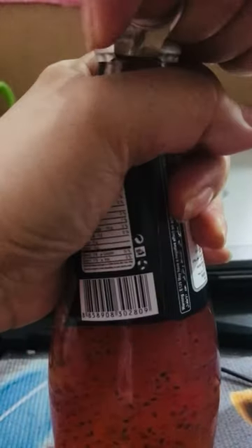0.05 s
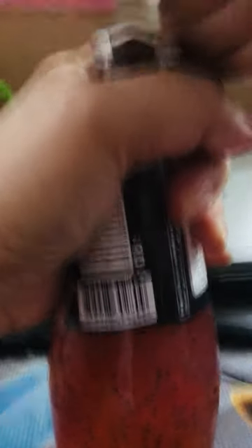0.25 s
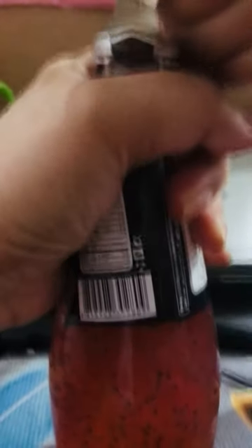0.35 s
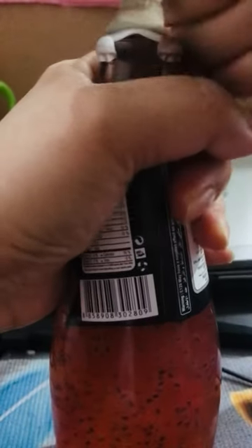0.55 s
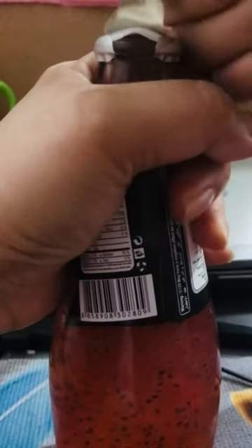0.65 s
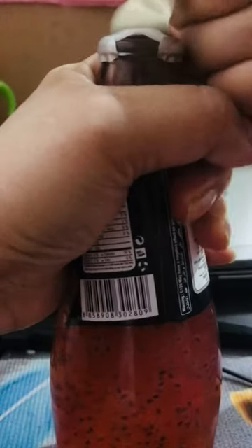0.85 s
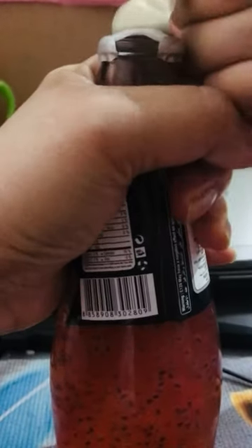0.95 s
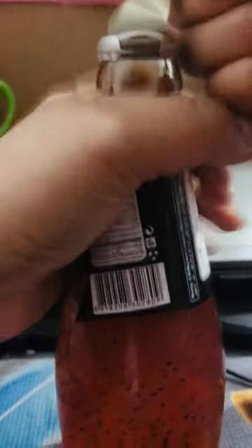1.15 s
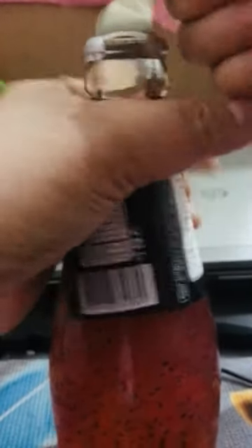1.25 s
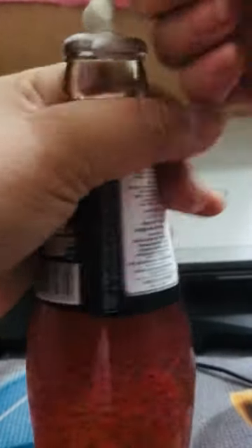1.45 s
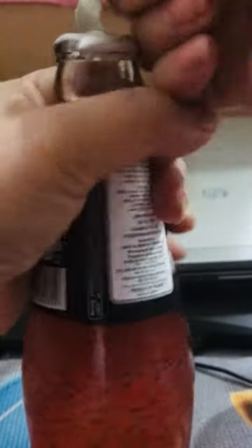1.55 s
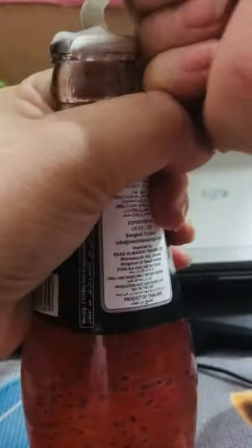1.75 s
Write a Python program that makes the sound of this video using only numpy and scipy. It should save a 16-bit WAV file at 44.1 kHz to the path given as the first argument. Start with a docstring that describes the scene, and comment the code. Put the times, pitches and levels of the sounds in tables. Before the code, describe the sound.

A glass bottle's metal cap pops open with a sharp crack and dull thump at about 0.25 seconds, after a faint whistling hiss. Soft finger rubbing follows. From 1.1 seconds the cap scrapes and ticks on the rim, clinks against the glass at 1.4, and clicks back on near 1.8. Everything is close, in a small room with a faint low hum.

```python
"""A small room, the microphone close to a glass bottle whose metal pull-ring cap is being levered off.
Air hisses and whistles through the loosening seal, then the cap pops and jolts the bottle in the hand.
The cap scrapes off the rim, ticks, clinks against the glass and clicks back onto it.
Fingers rub and squeak faintly; behind them are a low rumble, a hum and the room's short tail."""
import sys
import numpy as np
from scipy import signal
from scipy.fft import rfft, irfft
from scipy.io import wavfile
from scipy.ndimage import uniform_filter1d

SR = 44100
rng = np.random.default_rng(int(sys.argv[2]) if len(sys.argv) > 2 else 0)


def to_wav(s):
    """Save 16-bit WAV."""
    ch = np.atleast_2d(s).T  # columns
    pcm = np.round(np.clip(ch, -1, 1) * 32767)  # PCM
    wavfile.write(sys.argv[1], SR, pcm.astype(np.int16))


N = 79380
T = np.arange(N) / SR

# Spectra of room tone, grip, scrape, leak and pop. Each row: frequency in Hz, relative level in dB.
RUMBLE_COLOUR = [(15, -57), (25, -26.5), (42, -2), (64, 1.5), (153, -12.5), (285, -14), (384, -18),
                 (451, -23), (641, -26), (2110, -32.5), (3160, -30.5), (4870, -35), (16000, -38.5)]
RUB_COLOUR = [(300, 3.5), (800, -4.5), (2400, -1.5), (4000, -2.5), (7500, -4.5), (11000, -7.5),
              (15000, -1.5), (17000, -16.5)]
SCRAPE_COLOUR = [(200, 12), (600, -18), (1500, -15.5), (2400, 1), (4000, -1.5), (7500, -4), (12000, -4),
                 (15000, 1.5), (17000, -0.5)]
LEAK_COLOUR = [(500, -14.5), (2700, -18.5), (4700, -12.5), (6600, -2.5), (8200, -17), (9600, -5.5),
               (10400, -9.5), (11500, 2.5), (15500, -1), (17000, -9)]
POP_COLOUR = [(150, -7), (350, 2), (550, -18.5), (850, -18), (1050, -2), (3500, -1.5), (5500, -6),
              (8200, -6), (10300, -11), (12500, 6), (15500, 0), (17000, -19.5)]
# The course of the rubbing grip and of the leaking air. Each row: time in seconds, level in dB.
RUB_LEVEL = [(.4, -76), (.62, -74.5), (.7, -68.5), (.8, -74.5), (.96, -69.5), (1.05, -64.5), (1.11, -60),
             (1.19, -53), (1.25, -56.5), (1.29, -54.5), (1.34, -62), (1.4, -54), (1.49, -60), (1.6, -67.5),
             (1.69, -69), (1.74, -65.5), (1.8, -58.5)]
LEAK_LEVEL = [(0, -53.5), (.035, -51.5), (.09, -53), (.128, -58), (.16, -56.5), (.185, -52.5),
              (.217, -54.5), (.224, -37.5), (.24, -44)]
# Skin sliding on metal. Each row: centre in seconds, level in dB, half length in seconds.
SLIDES = [(1.588, -63, 0.031), (1.713, -61, .003), (1.721, -60, .009)]
# Skin squeaking on glass. Each row: centre and half length in seconds, pitch in Hz, level in dB.
SQUEAKS = [(.72, 0.037, 3106, -75), (1.011, 0.023, 3590, -60)]
# Jolts of the bottle. Each row: start in seconds, level in dB, pitch in Hz, T60 in seconds.
JOLTS = [(0.053, -49, 242, 0.04), (.097, -45.5, 243, 0.031), (0.2228, -33, 210, 0.047),
         (0.2418, -14.5, 246.4, 0.042), (0.2485, -12, 72.8, 0.1), (0.2511, -23, 190, .05),
         (.2512, -24, 359.6, 0.042), (.298, -42, 125, 0.16), (.375, -42, 79.6, 0.1),
         (0.653, -48.5, 450, .04), (0.933, -46.5, 242, 0.038), (1.139, -36, 227, 0.047),
         (1.158, -44, 250, 0.062), (1.16, -27.5, 62.3, 0.13), (1.409, -34.5, 62.4, 0.063),
         (1.531, -46, 74, 0.091), (1.771, -54, 380, 0.07)]
# The cap dragged over the rim. Each row: start in seconds, level in dB, hold in seconds.
SCRAPES = [(1.139, -43, .002), (1.141, -40, 0.0027), (1.1505, -44.5, .003), (1.156, -35.5, 0.0044),
           (1.173, -49, 0.013)]
# Ticks of cap and fingers. Each row: start in seconds, knock in dB, its pitch in Hz, crack in dB.
TICKS = [(.051, -50.5, 2640, -45), (.076, -51.5, 1880, -66), (.096, -54, 2670, -71),
         (0.195, -52.5, 2160, -53), (0.222, -39.5, 2400, -37), (0.2905, -38.5, 2974, -37.5),
         (.333, -52, 1870, -57), (.366, -57.5, 4500, -52), (0.572, -58, 2504, -58.5), (.65, -52, 1000, -61),
         (.665, -71.5, 3200, -53), (1.0647, -44.5, 3600, -44), (1.068, -47.5, 3000, -42.5),
         (1.086, -59, 3500, -54.5), (1.134, -38.5, 2130, -42), (1.187, -49, 1810, -55),
         (1.207, -44, 2420, -38), (1.2324, -39.5, 3930, -34), (1.241, -50, 3000, -50),
         (1.258, -39.5, 2100, -46), (1.272, -45, 2010, -62), (1.2815, -35.5, 2500, -37.5),
         (1.288, -51, 3070, -52), (1.3047, -45, 3280, -73), (1.355, -56, 3100, -33.5),
         (1.387, -53.5, 702, -60), (1.397, -44, 2100, -60), (1.403, -42, 2180, -51),
         (1.411, -40, 2480, -39), (1.469, -40.5, 1310, -59), (1.4744, -41, 2090, -60),
         (1.524, -42, 3340, -44)]
# Ringing modes. Each row: frequency in Hz, level in dB, T60 in seconds.
GLASS_MODES = [(2235, -1.5, 0.27), (2620, -3.5, .3), (5340, -12.5, 0.29), (11600, -16, .13)]
NECK_AIR_MODES = [(1065, -20.5, 0.035), (1070, -58, 0.65)]
BENT_CAP_MODES = [(1610, -26.5, 0.019), (2563, -30.5, 0.026), (2712, -24.5, 0.044), (4045, -25.5, 0.03),
                  (4192, -23, .02), (5170, -34, .03), (5500, -30, 0.029), (6260, -24, 0.018),
                  (6840, -29.5, .025), (9350, -29.5, .018), (12510, -26, 0.022), (13600, -30, .022),
                  (14210, -26, 0.026), (14720, -26, .018)]
FREED_CAP_MODES = [(3334, -16.5, .04), (3490, -26.5, .022)]
LOOSE_CAP_MODES = [(1580, -22, 0.01), (2450, -9.5, 0.019), (2546, 2, 0.013), (3500, -6.5, .02),
                   (3875, 3.5, .016), (4240, -37, 0.23), (5244, -6.5, 0.09), (6056, -22.5, 0.13),
                   (6640, -25.5, 0.13), (8550, -18, 0.067), (8770, -14, 0.097), (9200, -10.5, 0.047),
                   (9200, -15.5, 0.073), (11700, -16, 0.053), (12900, -23, 0.026)]
SEATED_CAP_MODES = [(3165, -3.5, 0.019), (5790, -1.5, 0.015), (7070, -4, 0.0081), (8800, -2, 0.0092),
                    (9950, -13, 0.02), (12030, -2, 0.014), (12200, -8, .032), (14060, -9, .033),
                    (14900, -3, .022)]
# Touches on the glass, and crimps jumping the rim. Each row: start in seconds, gain in dB.
GLASS_TOUCHES = [(.245, -54), (1.069, -63.5), (1.14, -40.5), (1.16, -42.5), (1.355, -50.5), (1.511, -57)]
CRIMP_SNAPS = [(0.2401, -3), (0.2403, -7), (0.243, 5.5), (0.2455, -3), (0.2472, 2.5), (0.2491, -3)]
# Cap on glass. Each row: start in seconds, ring and knock in dB, knock pitch in Hz, crack in dB.
CLINKS = [(1.4157, -21.5, -28.5, 2440, -25.5), (1.509, -46, -29.5, 3900, -33),
          (1.5199, -49.5, -46, 5160, -46)]
# The cap pressed back on. Each row: start in seconds, gain in dB, low cut in Hz.
CLICKS = [(1.7573, -39.5, 9050), (1.7705, -28, 1950)]
# Two whistles in the gap and a list of short ones. Each row: time in seconds, pitch in Hz, level in dB.
LOW_WHISTLE = [(0, 7015, -62), (.04, 7390, -62), (.062, 6820, -56.5), (.08, 6480, -57.5), (.125, 5850, -63),
               (.15, 6320, -60.5), (.19, 6430, -66.5)]
HIGH_WHISTLE = [(.14, 8370, -70), (0.159, 9100, -56.5), (.171, 11800, -55.5), (0.187, 11100, -52.5),
                (.205, 10800, -57.5), (.222, 11300, -56)]
SIDE_WHISTLES = [
    [(.003, 10500, -66), (.016, 9300, -57.5), (.032, 8500, -83)],
    [(.135, 6000, -67), (.16, 5000, -66)],
    [(.172, 6700, -67.5), (.19, 5400, -62.5)],
    [(.178, 12300, -57), (.215, 11500, -53.5)],
]

POP_S, POP_ATTACK_S, CAP_FREE_S = .24, .002, .2488
TICK_T60_S, KNOCK_SPREAD = .0053, 1.22
WHISTLE_WIDTH_HZ, WHISTLE_WOBBLE = 210, .0063
RUMBLE_DB, HUM_DB, HUM_HZ = -60.5, -60.5, 57.5
CAP_LOW_HZ, MIC_LOW_HZ, TOP_HZ, CEILING = 1440, 44.2, 15850, .85


def amp(db):
    """Decibels to gain."""
    return 10 ** (np.asarray(db) / 20)


def unit(x):
    """Scale to rms 1."""
    return x / np.sqrt(np.mean(x ** 2))


def noise():
    """White noise."""
    return rng.standard_normal(N)


def band(x, lo_hz, hi_hz):
    """Band-pass."""
    sos = signal.butter(2, [lo_hz, min(hi_hz, SR / 2 - 1)], "band", fs=SR, output="sos")
    return signal.sosfilt(sos, x)


def colour(x, points):
    """Shape a steady sound by (Hz, dB) points; rms 1."""
    hz, db = np.array(points).T
    gain = amp(np.interp(np.log(np.fft.rfftfreq(N, 1 / SR) + 1), np.log(hz), db))
    return unit(irfft(rfft(x) * gain, N))


def walk(hz):
    """Random drift, mostly slower than hz; rms 1."""
    return unit(irfft(rfft(noise()) * np.exp(-(np.fft.rfftfreq(N, 1 / SR) / hz) ** 2), N))


def grains(per_s):
    """Dense micro-slips of random size."""
    return unit(noise() * (rng.random(N) < per_s / SR))


def fade(t60, hold=0):
    """Hold, then fall 60 dB every t60 seconds."""
    return np.exp(-np.log(1000) * np.clip((T - hold) / t60, 0, 10))


def at(s, x):
    """Start a sound at s seconds."""
    return np.concatenate([np.zeros(max(int(s * SR), 0)), x])[:N]


def burst(lo_hz, hi_hz, t60):
    """A short crack within a band; starts at about rms 1."""
    return band(noise() * fade(t60), lo_hz, hi_hz) * np.sqrt(SR / 2 / (hi_hz - lo_hz))


def ring(modes):
    """Struck modes, each a dying sine."""
    return sum(amp(db) * fade(t60) * np.sin(2 * np.pi * hz * T) for hz, db, t60 in modes)


def cap_ring(modes):
    """The struck cap, with its lowest frequencies removed."""
    return signal.sosfilt(signal.butter(4, CAP_LOW_HZ, "high", fs=SR, output="sos"), ring(modes))


def room_tone():
    """Quiet rumble and a wavering low hum, behind everything."""
    hum = np.sqrt(2) * np.sin(2 * np.pi * HUM_HZ * T + 1.2 * walk(2.6)) * amp(HUM_DB + 1.1 * walk(6))
    return amp(RUMBLE_DB) * colour(noise(), RUMBLE_COLOUR) + hum


def room_tail(x):
    """The small room answers with a diffuse tail, longest in the bass, blurred to a wash above it."""
    def tail(lo_hz, hi_hz, db, t60):
        reflections = unit(noise() * fade(t60) * np.minimum(T / .011, 1))
        return amp(db) * band(reflections, lo_hz, hi_hz) / np.sqrt(N)
    phase_drift = 3.2 * walk(hz=194)
    blurred = np.real(signal.hilbert(band(x, 350, 20000)) * np.exp(1j * phase_drift))
    mids = tail(450, 1300, db=-16.5, t60=.26) + tail(1200, 5500, db=-24.5, t60=.26)
    treble = tail(6900, 16000, db=-27, t60=.15)
    bass = tail(90, 400, db=-16, t60=.39)
    return (signal.fftconvolve(blurred, mids + treble) + signal.fftconvolve(x, bass))[:N]


def grip():
    """Fingers and cap rub softly on the bottle; skin slides over metal with a thin hiss."""
    level_db = np.interp(T, *np.array(RUB_LEVEL).T) + 3.8 * walk(50)
    rub = colour(grains(per_s=3500), RUB_COLOUR) * amp(level_db)
    slides = sum(amp(db) * np.exp(-((T - s) / half_s) ** 2) for s, db, half_s in SLIDES)
    return rub + slides * unit(band(noise(), 12800, 16400))


def squeaks():
    """Skin squeaks faintly on glass: four rough harmonics, each weaker than the last."""
    out = 0
    for s, half_s, hz, db in SQUEAKS:
        swell = np.exp(-((T - s) / half_s) ** 2)
        for k in range(4):
            harmonic = unit(band(noise(), (k + 1) * hz - 200, (k + 1) * hz + 400))
            out += amp(db - 7 * k) * harmonic * swell
    return out


def jolts():
    """The bottle jolts in the hand with dull, damped thumps."""
    return sum(at(s, ring([(hz, db, t60)])) for s, db, hz, t60 in JOLTS)


def scrapes():
    """The cap drags over the rim in short runs of gritty slips."""
    grit = colour(grains(per_s=5000), SCRAPE_COLOUR)
    return grit * sum(at(s, amp(db) * fade(t60=.039, hold=hold)) for s, db, hold in SCRAPES)


def ticks():
    """Cap and fingers make damped knocks, each with a bright crack."""
    out = 0
    for s, knock_db, hz, crack_db in TICKS:
        knock = amp(knock_db) * burst(hz / KNOCK_SPREAD, hz * KNOCK_SPREAD, t60=.012)
        crack = amp(crack_db) * burst(2500, 19000, TICK_T60_S)
        out += at(s, knock + crack)
    return out


def clinks():
    """The glass rings when touched; the loose cap strikes it and bounces."""
    glass, cap = ring(GLASS_MODES), cap_ring(LOOSE_CAP_MODES)
    out = sum(at(s, amp(db) * glass) for s, db in GLASS_TOUCHES)
    for s, ring_db, knock_db, hz, crack_db in CLINKS:
        knock = amp(knock_db) * burst(hz / .88, hz * 1.18, TICK_T60_S)
        crack = amp(crack_db) * burst(11500, 14200, t60=.014)
        out += at(s, amp(ring_db) * cap + knock + crack)
    return out


def clicks():
    """The cap catches on the rim, then seats, each time with a crack and a brief ring."""
    cap = ring(SEATED_CAP_MODES)
    out = 0
    for s, db, lo_hz in CLICKS:
        crack = amp(11) * noise() * fade(t60=.0035)
        out += at(s, amp(db) * band(cap + crack, lo_hz, 16900))
    return out


def whistle(curve):
    """Air in the gap sounds a breathy edge tone that glides and wobbles."""
    s, hz, db = np.array(curve).T
    pitch_hz = np.interp(T, s, hz) * (1 + WHISTLE_WOBBLE * walk(50))
    phase = 2 * np.pi * np.cumsum(pitch_hz) / SR
    tone = walk(WHISTLE_WIDTH_HZ) * np.sin(phase) + walk(WHISTLE_WIDTH_HZ) * np.cos(phase)
    return tone * uniform_filter1d(np.interp(T, s, amp(db), left=0, right=0), size=300)


def leak():
    """Air hisses and whistles through the seal until it opens."""
    level_db = np.interp(T, *np.array(LEAK_LEVEL).T) + 3.6 * walk(60)
    hiss = colour(noise(), LEAK_COLOUR) * amp(level_db) * fade(t60=.01, hold=POP_S)
    return hiss + sum(whistle(curve) for curve in [LOW_WHISTLE, HIGH_WHISTLE] + SIDE_WHISTLES)


def pop():
    """The seal gives: air rushes, the neck rings, the crimps snap over the rim, the freed cap pings."""
    envelope = np.minimum(T / POP_ATTACK_S, 1) * fade(t60=.015, hold=.0064)
    rush = at(POP_S, amp(-14) * colour(noise(), POP_COLOUR) * envelope)
    neck = at(POP_S + POP_ATTACK_S, ring(NECK_AIR_MODES))
    cap = cap_ring(BENT_CAP_MODES)
    snaps = 0
    for s, db in CRIMP_SNAPS:
        crack = amp(-10.5) * burst(2900, 25000, t60=.003)
        snaps += at(s, amp(db) * (cap + crack))
    ping = at(CAP_FREE_S, cap_ring(FREED_CAP_MODES))
    return rush + neck + snaps + ping


def scene():
    """The bottle close to one microphone, the room behind it."""
    near = grip() + squeaks() + jolts() + scrapes() + ticks() + clinks() + clicks() + leak() + pop()
    return (room_tone() + room_tail(near) + near)[None]


def record(dry):
    """The microphone loses the deepest bass; the highest peaks are rounded softly; the recorder cuts the top."""
    thin = signal.sosfilt(signal.butter(3, MIC_LOW_HZ, "high", fs=SR, output="sos"), dry)
    rounded = thin / (1 + (thin / CEILING) ** 4) ** (1 / 4)
    return signal.sosfilt(signal.ellip(12, .2, 95, TOP_HZ, fs=SR, output="sos"), rounded)


dry = scene()
out = record(dry)
to_wav(out)
```